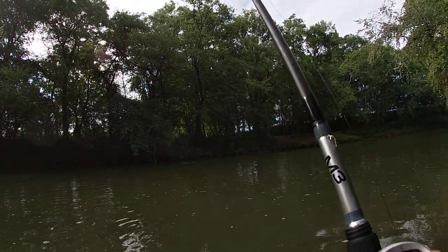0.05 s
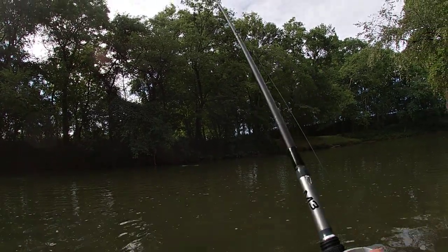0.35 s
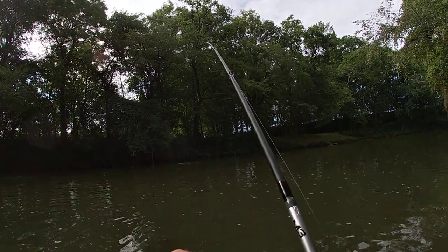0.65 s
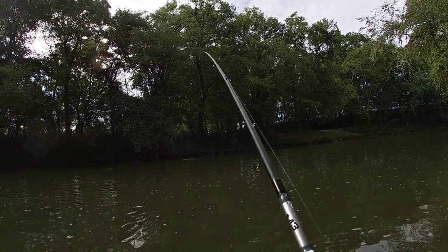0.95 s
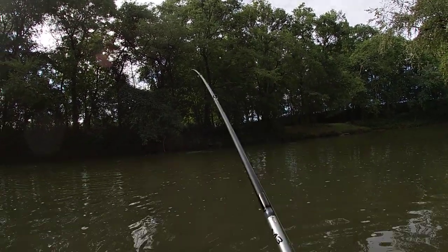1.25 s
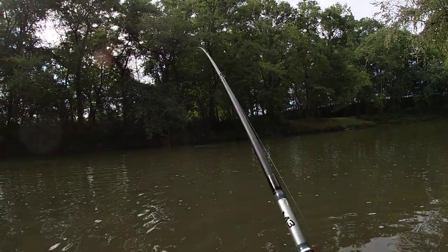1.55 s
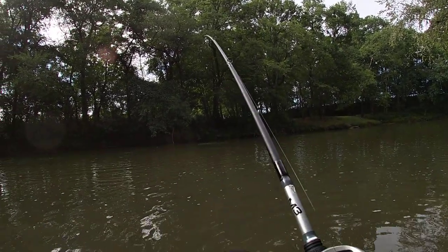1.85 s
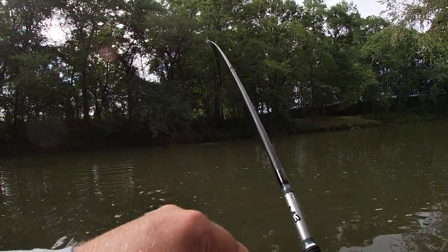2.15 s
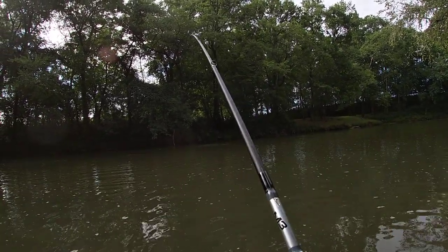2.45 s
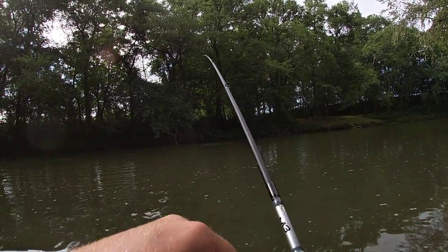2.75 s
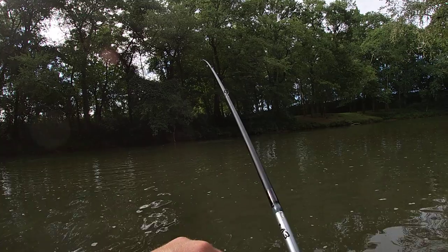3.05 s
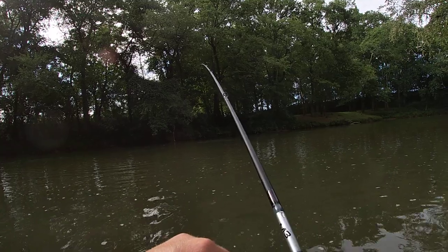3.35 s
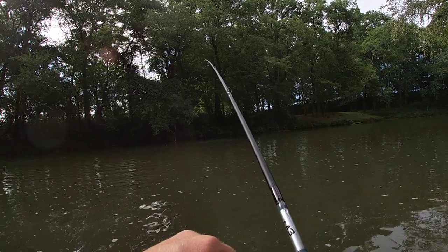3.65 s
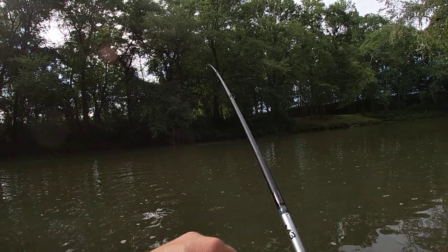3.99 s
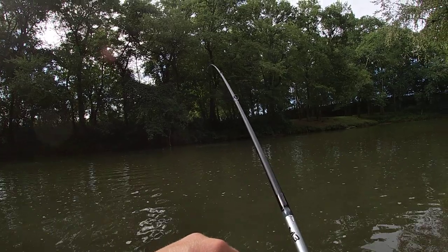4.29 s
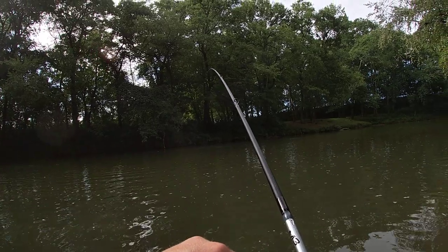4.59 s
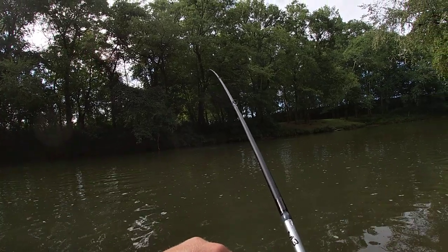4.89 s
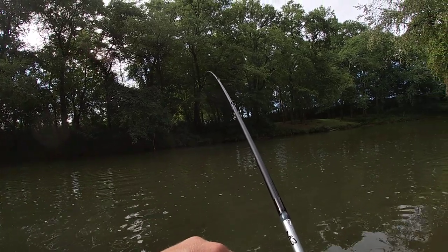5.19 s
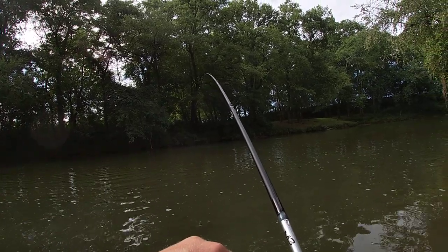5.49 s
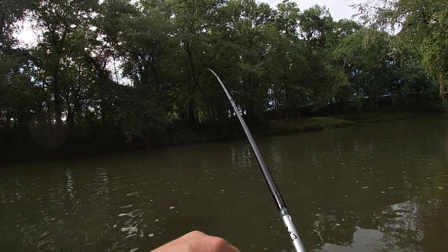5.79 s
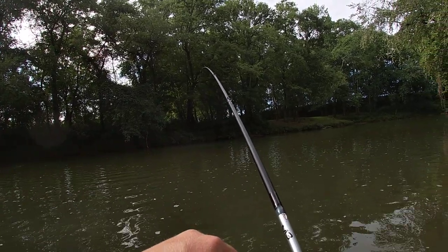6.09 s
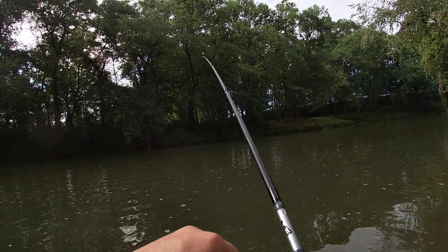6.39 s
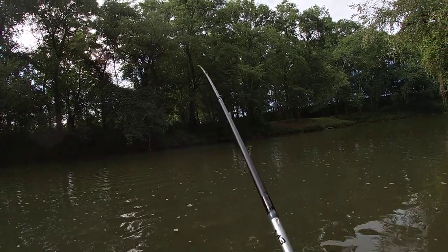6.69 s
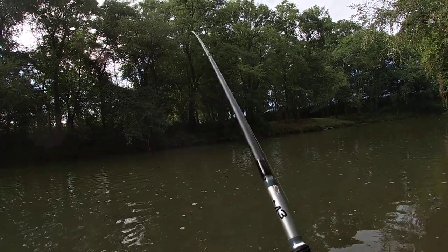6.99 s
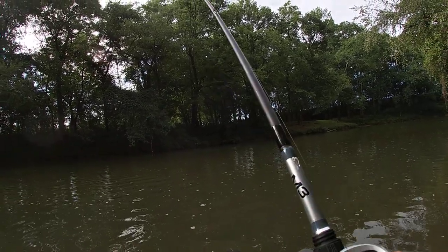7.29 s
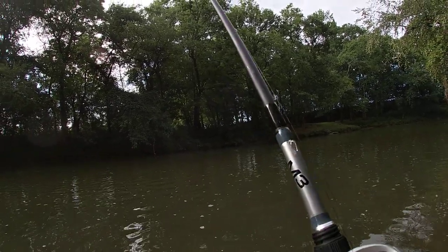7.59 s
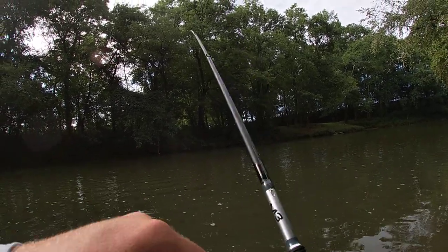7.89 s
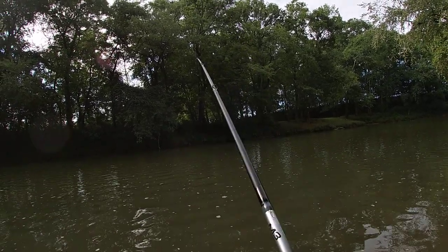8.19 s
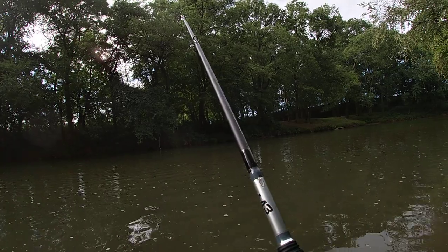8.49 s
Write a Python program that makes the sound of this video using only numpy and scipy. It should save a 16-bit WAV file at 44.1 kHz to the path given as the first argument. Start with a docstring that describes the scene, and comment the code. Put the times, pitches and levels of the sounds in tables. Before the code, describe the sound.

A spinning reel whirrs steadily right at the microphone while taut line rasps and squeaks through the rod guides in short tugs. About three and a half seconds in, the drag rattles with bright metallic clicks and the line squeals up in pitch, then sinks. After a quieter stretch, a second surge comes near seven seconds. The rod knocks softly now and then, with a faint creek and light wind beneath.

```python
"""A spinning reel whirrs right at the microphone as an angler cranks against a hooked fish.
Gear teeth excite the housing's resonances and throb with the rotor. Taut line rasps and sings through
the rod guides by stick-slip friction, higher the faster it runs. When the fish surges, the drag slips
and its clicker sets the spool ringing. The rod knocks softly; faint wind and a creek lie beneath."""
import sys
import numpy as np
from scipy import signal
from scipy.fft import rfft, irfft
from scipy.io import wavfile
from scipy.ndimage import uniform_filter1d

SR = 44100
rng = np.random.default_rng(int(sys.argv[2]) if len(sys.argv) > 2 else 0)


def wav_record(signal):
    """Record a signal, one row per channel, as 16-bit PCM in the file named by sys.argv[1]."""
    frames = np.transpose(np.atleast_2d(signal))
    bounded = np.clip(frames, -1, 1)
    # unit amplitude maps onto the largest positive 16-bit level
    quanta = np.round(bounded * 32767).astype(np.int16)
    wavfile.write(sys.argv[1], SR, quanta)


N = 381024
TIME = np.arange(N) / SR
BIN_HZ = np.maximum(np.arange(N // 2 + 1) * SR / N, 1)


def from_db(db):
    """Decibels as an amplitude ratio."""
    return 10 ** (np.asarray(db) / 20)

def unit_rms(x):
    """Normalisation to unit power."""
    return x / np.sqrt(np.mean(x ** 2) + 1e-20)

def in_time(rows):
    """Linear interpolation of each column at every sample."""
    times, *columns = np.transpose(rows)
    return [np.interp(TIME, times, column) for column in columns]

def response_db(spectrum, hz, modes=()):
    """Frequency response: a curve on a log-frequency axis plus Lorentzian resonances."""
    knots_hz, knots_db = np.transpose(spectrum)
    resonances = sum(db / (1 + (2 * (hz - centre) / width) ** 2) for centre, width, db in modes)
    return np.interp(np.log(hz), np.log(knots_hz), knots_db) + resonances

def coloured(x, spectrum, modes=()):
    """Source and filter: an excitation shaped by a frequency response, at unit power."""
    return unit_rms(irfft(rfft(x) * from_db(response_db(spectrum, BIN_HZ, modes)), N))

def noise():
    """White Gaussian noise."""
    return rng.standard_normal(N)

def drift(rate_hz):
    """Random modulation: low-passed noise of unit power."""
    return unit_rms(irfft(rfft(noise()) / (1 + (BIN_HZ / rate_hz) ** 2), N))

def band(x, low_hz, high_hz):
    """Gentle Butterworth band-pass."""
    return signal.sosfilt(signal.butter(2, [low_hz, high_hz], "band", fs=SR, output="sos"), x + 1e-18)

def ring(x, hz, t60_s):
    """Damped resonator: a unit impulse starts a sine of amplitude 1."""
    radius, step = from_db(-60 / (t60_s * SR)), 2 * np.pi * hz / SR
    return signal.lfilter([0, np.sin(step)], [1, -2 * radius * np.cos(step), radius ** 2], x + 1e-18)

def grains(per_s, spread_db):
    """Poisson process: tiny impacts of uneven size and either sign."""
    sizes = from_db(spread_db * np.clip(noise(), -2, 2)) * rng.choice([-1, 1], N)
    return sizes * (rng.random(N) < per_s / SR)

def impulses(times, heights):
    """Ideal impacts: one impulse at each time."""
    out = np.zeros(N)
    out[np.clip(np.round(np.asarray(times) * SR).astype(int), 0, N - 1)] = heights
    return out

def bursts(x, t60_s):
    """Exponential decay: each impulse becomes a dying burst of noise."""
    return signal.lfilter([1], [1, -from_db(-60 / (t60_s * SR))], x + 1e-18) * noise()

def envelope(start, length, attack_s, release_s):
    """Gate with linear ramps centred on its start and end."""
    rise = np.clip(.5 + (TIME - start) / attack_s, 0, 1)
    fall = np.clip(.5 + (start + length - TIME) / release_s, 0, 1)
    return rise * fall

def swells(rows, wander, wander_hz):
    """Tones under half-cosine windows, with random frequency modulation."""
    clock = np.cumsum(1 + wander * drift(wander_hz)) / SR
    out = np.zeros(N)
    for middle, length, hz, db in rows:
        on = np.abs(TIME - middle) < length / 2
        window = np.cos(np.pi * (TIME[on] - middle) / length)
        out[on] += from_db(db + 4) * window * np.sin(2 * np.pi * hz * clock[on])
    return out


# spectrum of the creek and its bank: frequency_hz, gain_db
CREEK_SPECTRUM = [(40, 5.5), (70, -12), (115, -4), (165, 8), (200, 6.5), (260, 2), (400, -5), (700, 1.5),
                  (1200, -36), (3000, 0), (12000, -44)]
def creek(level_db=-49.5):
    """Stationary filtered noise: the steady murmur of water."""
    return from_db(level_db) * coloured(noise(), CREEK_SPECTRUM)

# spectrum of wind on the microphone: frequency_hz, gain_db
WIND_SPECTRUM = [(15, -9), (30, 2), (50, -13.5), (80, -17), (160, -26), (500, -62)]
# puffs of wind: start_s, length_s, level_db
WIND_GUSTS = [(0, 0.11, -53), (.32, 0.38, -42), (1.25, 0.28, -52), (2.5, .25, -63), (4.25, 2.77, -67),
              (7.961, 0.097, -41)]
def wind(calm_db=-65):
    """Turbulent pressure on the microphone: a low rumble that rises in puffs."""
    gusts = sum(from_db(db) * envelope(start, length, attack_s=.05, release_s=.1)
                for start, length, db in WIND_GUSTS)
    return (from_db(calm_db) + gusts) * coloured(noise(), WIND_SPECTRUM)

# faint hums from afar: middle_s, length_s, pitch_hz, relative_level_db
DISTANT_HUMS = [(5.5, 2.6, 64, -59), (6.5, 2, 212, -58)]
def distant_hums():
    """Slow frequency modulation makes two low tones waver."""
    return swells(DISTANT_HUMS, wander=.0206, wander_hz=7.9)

def handling():
    """Sliding friction: the hand brushes the rod grip as it takes hold of the crank."""
    # time_s, level_db
    brush = [(0, -81), (.1, -71), (.13, -32), (.25, -31.5), (.28, -29), (.35, -27), (.45, -34.5),
             (.65, -44), (.75, -62)]
    return from_db(in_time(brush)[0]) * unit_rms(band(noise(), 200, 1000))

# knocks on the rod: start_s, relative_level_db, pitch_hz, t60_s
ROD_KNOCKS = [(0.103, -16.5, 725, 0.022), (0.127, -11, 410, 0.035), (0.18, -19, 380, .03),
              (0.259, -8.5, 179, 0.23), (6.305, -22.5, 676, 0.057), (6.313, -25, 333.5, 0.058),
              (6.694, -18.5, 544, 0.0055), (7.96, -27, 1503, 0.02), (8.033, -24, 1187, 0.0072),
              (8.253, -25, 298, 0.23)]
def knocks():
    """Impact excitation: the rod shifts in the grip, giving a hollow damped tone and a dull thud."""
    starts, levels_db, _, _ = np.transpose(ROD_KNOCKS)
    tones = sum(ring(impulses([start], from_db(db - .5)), hz, t60) for start, db, hz, t60 in ROD_KNOCKS)
    thuds = bursts(impulses(starts, from_db(levels_db)), t60_s=.022)
    return band(tones + band(thuds, 400, 2300), 290, 6000)

# squeaks of the line: middle_s, length_s, pitch_hz, relative_level_db
LINE_SQUEAKS = [(.372, .044, 2360, -24), (.508, .058, 2430, -26), (.51, 0.05, 800, -29.5),
                (.615, .028, 2780, -32), (.66, 0.027, 3400, -22), (1.415, .04, 2600, -29),
                (1.635, 0.06, 2292, -30), (3.495, .025, 2040, -24), (3.695, .018, 2520, -19.5),
                (3.82, .22, 1815, -25.5), (7.048, 0.037, 2495, -23), (7.055, 0.099, 2960, -22.5),
                (7.29, 0.028, 3300, -24.5), (7.365, 0.088, 4160, -29), (7.595, 0.073, 3500, -40),
                (8.19, .025, 1920, -26), (8.325, .04, 1849, -21), (8.42, .13, 2502, -32)]
def squeaks():
    """Friction-induced oscillation: brief rough tones as the line bites."""
    return swells(LINE_SQUEAKS, wander=.0308, wander_hz=192)

# cranking speed of the rotor: time_s, turns_per_s
ROTOR_SPEED = [(0, 10.6), (2.45, 13.2), (3.5, 15.6), (4.2, 9), (5.6, 12.1), (6.0, 11.7), (6.65, 10.4),
               (7.5, 10.85), (8.64, 11.3)]
def rotor_angle():
    """Angle in radians, the integral of rotation speed; it modulates line and gears alike."""
    return 2 * np.pi * np.cumsum(in_time(ROTOR_SPEED)[0]) / SR

# line creeping over the guides between tugs: time_s, level_db
LINE_CREEP = [(0, -40), (.95, -43), (1.8, -37), (2.1, -39.5), (2.9, -49), (3.0, -36), (3.2, -43),
              (5.3, -43.5), (5.6, -56), (6.6, -57), (7.0, -38.5), (7.9, -45.5), (8.64, -38.5)]
# short tugs of the fish: start_s, length_s, level_db, top_pitch_hz, tonal_share
FISH_TUGS = [(.09, .17, -33.5, 600, .05), (0.261, 0.16, -28, 800, 0.3), (0.478, 0.11, -25.5, 810, 0),
             (0.596, 0.11, -25.5, 880, 0.28), (0.995, .16, -37.5, 790, 0.5), (1.239, 0.12, -28, 720, 0.1),
             (1.375, .09, -26, 900, 0.05), (1.51, 0.088, -24.5, 1222, 0.61), (1.555, 0.18, -27, 1150, 0.75),
             (1.76, .18, -34, 880.2, 0.23), (2.15, .105, -27, 1228, 0.6), (2.289, 0.15, -33.5, 860, 0.26),
             (2.505, 0.092, -27, 1160, .65), (2.639, .3, -43, 807, 0.4), (3.056, 0.099, -28.5, 950, 0.58),
             (3.214, 0.13, -24, 1020, 0.37), (5.478, 0.063, -39, 650, 0.1),
             (5.816, 0.091, -33.5, 610, 0.24), (6.052, 0.15, -34, 657, 0.04),
             (6.187, .15, -32.5, 628, 0.04), (6.71, .1, -35.5, 600, 0.1), (6.856, 0.14, -29.5, 800, 0.01),
             (7.739, 0.085, -30.5, 820, 0.27), (7.958, 0.071, -34, 650, 0.01),
             (8.044, 0.062, -22.5, 950, 0.78), (8.176, 0.17, -22.5, 980, 0.28),
             (8.34, 0.19, -23, 1280, 0.47), (8.533, 0.13, -29.5, 800, 0.25)]
# two long runs of the fish: time_s, pitch_hz, level_db, tonal_share
FIRST_FISH_RUN = [(3.375, 1010, -25.5, 0.01), (3.58, 1253, -25, .05), (3.65, 1950, -21, .3),
                  (3.71, 1990, -24.5, 0.4), (3.76, 1940, -20, 0.7), (3.9, 1856, -21.5, 0.75),
                  (4.0, 1462, -26.5, 0.76), (4.1, 1085, -27.5, 0.7), (4.24, 1187, -30, .3),
                  (4.35, 852, -30.5, 0.66), (4.47, 847, -33.5, 0.43), (4.62, 947, -27.5, 0.75),
                  (4.72, 874, -32.5, 0.53), (5.05, 791, -34, 0.39), (5.35, 906, -38.5, 0)]
SECOND_FISH_RUN = [(7.0, 1000, -23, 0.022), (7.2, 1650, -26, .03), (7.34, 2120, -24, 0.21),
                   (7.39, 1804, -23, 0.52), (7.44, 1080, -26.5, 0.77), (7.49, 964, -29, 0.7),
                   (7.55, 1648, -24, 0.52), (7.62, 1738, -22, 0.5), (7.67, 1300, -24.5, 0.6),
                   (7.71, 742, -24, 0.56)]
def line_motion(creep_hz=741, creep_tonal_share=.17, attack_s=.022, release_s=.04):
    """Power summation of pulls: the strongest leads the friction's gain, pitch and tonal share."""
    pulls = [(from_db(in_time(LINE_CREEP)[0]), creep_hz, creep_tonal_share)]
    for start, length, db, top_hz, share in FISH_TUGS:
        # the line speeds up and slows, so the pitch arches; longer tugs sag more at their ends
        from_crest = np.interp(TIME, [start, start + .45 * length, start + length], [-1, 0, 1])
        sag = min(2.4 * length, .3)
        gain = from_db(db) * envelope(start, length, attack_s, release_s)
        pulls.append((gain, top_hz * (1 - sag * from_crest ** 2), share))
    for run in (FIRST_FISH_RUN, SECOND_FISH_RUN):
        hz, db, share = in_time(run)
        start, end = run[0][0], run[-1][0]
        pulls.append((from_db(db) * envelope(start, end - start, attack_s, release_s), hz, share))
    power = sum(gain ** 2 for gain, _, _ in pulls)
    pitch_hz = sum(gain ** 2 * hz for gain, hz, _ in pulls) / power
    tonal_share = sum(gain ** 2 * share for gain, _, share in pulls) / power
    return np.sqrt(power), pitch_hz, tonal_share

# the rod's response to the line's note: frequency_hz, gain_db
ROD_RESPONSE = [(180, -7), (500, 1.5), (800, -6.5), (1500, 2), (2500, -2.5), (3200, 5), (3700, 5),
                (4500, -13), (8000, -25)]
# resonances of the rod: centre_hz, width_hz, gain_db
ROD_RESONANCES = [(1040, 210, 1.4), (1880, 570, 10), (2490, 170, 9.8)]
def line_song(pitch_hz):
    """Stick-slip oscillation: three unsteady harmonics, weighted by the rod's response."""
    phase = 2 * np.pi * np.cumsum(pitch_hz * (1 + .028 * drift(160))) / SR
    song, power = 0, 0
    for k in (1, 2, 3):
        rolloff_db = (k - 1) ** 2
        gain = from_db(response_db(ROD_RESPONSE, k * pitch_hz, ROD_RESONANCES) - rolloff_db)
        # the grip comes and goes, so each partial flutters and sputters
        flutter = .48 + .46 * (drift(55) + 1j * drift(55))
        sputter = from_db(-1.5 * np.tanh(2.2 * drift(22)))
        song += gain * sputter * np.real(flutter * np.exp(1j * k * phase))
        # the partials below about 2 kHz share the friction's power
        power += gain ** 2 / (1 + (k * pitch_hz / 2300) ** 8)
    song /= np.sqrt(power)
    # levelled over about 40 ms, so that line tension sets the loudness
    song /= np.sqrt(uniform_filter1d(song ** 2, size=1800) + 1e-9)
    grip = 1 + .35 * np.tanh(2 * drift(20))  # brief losses of grip break the note up
    return song * grip

# friction noise radiated by rod and reel: frequency_hz, gain_db
RASP_SPECTRUM = [(80, -40), (150, -34), (300, -15), (520, -8), (800, -4.5), (1100, 2.5), (1400, -2),
                 (1900, 5), (2800, -2), (4200, -1.5), (7300, -0.5), (8500, -8.5), (10300, -14.5),
                 (11200, -25.5), (13000, -26.5), (15500, -43)]
def line(friction, pitch_hz, tonal_share, wobble=.025, stutter=.19):
    """Friction on the guides: a note inside a gritty rasp, modulated once per rotor turn."""
    swing = np.sin(rotor_angle())
    song = line_song(pitch_hz * (1 + wobble * swing))
    grit = grains(per_s=4000, spread_db=0) * from_db(1.4 * drift(43))
    rasp = from_db(1.5) * coloured(grit, RASP_SPECTRUM)
    gain = friction * (1 + stutter * tonal_share * swing) * from_db(1.6 * drift(6.8))
    return gain * (np.sqrt(tonal_share) * song + np.sqrt(1 - tonal_share) * rasp)

# slips of the drag: start_s, length_s, rattle_db, clicks_per_s, tick_over_ring_db
DRAG_SLIPS = [(1.278, 0.22, -31, 30, -11), (1.504, 0.13, -25.5, 32, -5.5), (2.168, 0.19, -31.5, 20.4, -7),
              (3.38, 0.14, -25, 82, -14), (3.53, .19, -19.5, 35, -17), (3.743, 0.088, -28, 30.5, -22),
              (5.818, .06, -30.5, 47, -10), (6.0, .3, -40.5, 23.5, -4), (6.883, .13, -32.5, 52, -14),
              (7.027, .29, -24, 90, -9), (7.328, 0.17, -27, 20, -13), (8.21, .25, -34, 49, 1.5)]
def slip_clicks(over_rattle_db=12.5, spread_db=4):
    """Teeth pass the clicker at log-normal intervals; gives rows of start_s, ring_db, tick_db."""
    rows = []
    for start, length, rattle_db, per_s, tick_over_ring_db in DRAG_SLIPS:
        pause, strength, snap = rng.standard_normal((80, 3)).T
        times = start + np.cumsum(np.exp(.55 * pause - .15)) / per_s
        ring_db = rattle_db + over_rattle_db + spread_db * np.clip(strength, -2, 2)
        tick_db = ring_db + tick_over_ring_db + spread_db * snap
        rows += list(np.transpose([times, ring_db, tick_db])[times < start + length])
    return rows

# hardest snaps of the clicker: start_s, relative_ring_db, relative_tick_db
HARD_CLICKS = [(1.4833, -6.5, -15), (2.508, -13.5, -15), (3.3794, -14, -15), (3.3896, -9, -19),
               (3.421, -10, -10), (3.47, -21, -9), (3.4876, -12, -23), (3.552, -15, -29),
               (3.6147, -13, -27), (3.638, -11, -16), (3.7092, -4, -29), (4.29, -26, -21),
               (4.969, -18, -20), (5.02, -14, -26), (5.1069, -16, -18), (5.252, -8.5, -17),
               (5.9873, -13, -27), (6.035, -14, -37), (6.0785, -16, -30), (6.1828, -14, -32),
               (6.208, -18, -22), (6.2236, -12.5, -21), (7.1528, -14, -24), (7.2247, -7, -18),
               (7.3098, -7, -23), (7.349, -4, -28), (7.395, -11, -31), (7.4493, -12, -30), (7.523, -9, -30),
               (8.402, -13, -17), (8.602, -29.5, -14.5)]
# modes of clicker and spool: frequency_hz, gain_db, t60_s
SPOOL_MODES = [(6000, 1.5, 0.0052), (6864, 7.5, 0.0069), (7420, 10, 0.0071), (8030, 4.5, 0.0016)]
def drag():
    """Modal ringing: each snap of the clicker ticks and rings the spool; slipping adds a dense rattle."""
    times, ring_db, tick_db = np.transpose(HARD_CLICKS + slip_clicks())
    teeth = grains(per_s=460, spread_db=2)
    rings, rattle = 0, 0
    for k, (hz, mode_db, t60) in enumerate(SPOOL_MODES):
        # neighbouring modes start in antiphase, so the ring takes a moment to build
        mode_gain = (-1) ** k * from_db(mode_db)
        snaps = impulses(times, from_db(ring_db - 2)) * from_db(.93 * noise())
        rings += mode_gain * ring(snaps, hz, t60)
        rattle += mode_gain * ring(teeth * from_db(4.2 * noise()), hz, t60)
    scrape = bursts(impulses(times, from_db(tick_db)), t60_s=.012)
    ticks = from_db(6.5) * band(scrape, 4430, 9340) + from_db(-3.5) * band(scrape, 10300, 12200)
    fine_ticks = band(bursts(teeth, t60_s=.0022), 6600, 13500)
    rattle = unit_rms(rattle) + from_db(-18.5) * unit_rms(fine_ticks)
    slipping = np.max([from_db(db) * envelope(start, length, attack_s=.01, release_s=.1)
                       for start, length, db, _, _ in DRAG_SLIPS], axis=0)
    return band(rings, 3700, 12000) + ticks + slipping * rattle

# loudness of the gears: time_s, relative_level_db
GEAR_LEVEL = [(0, -29), (1.5, -23), (3.3, -20.5), (3.365, -24.5), (3.4, -21.5), (4.4, -21), (5.5, -23),
              (6.98, -25), (7.05, -19), (7.11, -24), (7.8, -27.5), (8.14, -28), (8.25, -27), (8.64, -28.5)]
# load on the gears: time_s, low_shelf_db, relative_throb_depth
GEAR_LOAD = [(0, 4, 0.08), (.9, 4.5, 0.14), (1.7, 3.5, 0.19), (2.8, 2, 0.13), (3.6, -0.5, 0.21),
             (4.3, 1, 0.09), (5.6, -1, 0.03), (6.6, -1, 0.09), (7.8, -2, 0.2), (8.64, -0.5, 0.04)]
# response of the reel housing: frequency_hz, gain_db
HOUSING_RESPONSE = [(500, -30), (1400, -29.5), (2000, -23.5), (2600, -7), (3300, -4.5), (4500, -1),
                    (6000, 0), (7400, -2.5), (8000, -10.5), (8800, -25.5), (10000, -28.5), (11000, -35.5),
                    (13500, -37), (15000, -75)]
# resonances of the housing: centre_hz, width_hz, gain_db
HOUSING_RESONANCES = [(3210, 220, 4.5), (3555, 62, 6.5), (3844, 42, 8.5), (4280, 180, 3), (4740, 250, -2),
                      (5013, 170, 7), (5440, 42, 9.5), (5630, 120, 3), (6220, 470, 5.5), (6950, 150, 0)]
def gears(shelf_hz=4600):
    """Forced vibration: tooth contacts drive the housing, throbbing 2, 3 and 4 times per rotor turn."""
    level_db = in_time(GEAR_LEVEL)[0]
    shelf_db, depth = in_time(GEAR_LOAD)
    angle = rotor_angle()
    throb = np.cos(2 * angle) + .8 * np.cos(3 * angle) + .35 * np.cos(4 * angle)
    contacts = grains(per_s=9000, spread_db=3) * (1 + .7 * depth * throb)
    whirr = coloured(contacts, HOUSING_RESPONSE, HOUSING_RESONANCES)
    # heavier load brings out the lower half of the housing's range
    lower = irfft(rfft(whirr) / (1 + (BIN_HZ / shelf_hz) ** 8), N)
    upper = whirr - lower
    return from_db(level_db + 2) * (from_db(shelf_db) * lower + upper)

def scene():
    """Superposition in a free field: every source is central, with no echo."""
    reel = gears() + drag()
    rod = line(*line_motion()) + squeaks() + knocks() + handling()
    background = creek() + wind() + distant_hums()
    return np.tile(background + rod + reel, (2, 1))

# difference between the two microphone ports: frequency_hz, side_over_mid_db
PORT_DIFFERENCE = [(1000, -68), (5000, -70), (10000, -52), (11000, -31), (11800, -6.5), (16000, 3)]
def record(dry, peak_limit=.9, cutoff_hz=15800):
    """Soft saturation rounds the peaks, the top treble decorrelates between ports, a low-pass follows."""
    rounded = dry / (1 + np.abs(dry / peak_limit) ** 4) ** .25
    scattered = rounded[0] * np.sqrt(2) * np.cos(np.pi * drift(150))
    side = irfft(rfft(scattered) * from_db(response_db(PORT_DIFFERENCE, BIN_HZ)), N)
    low_pass = signal.ellip(10, .1, 80, cutoff_hz, fs=SR, output="sos")
    return signal.sosfilt(low_pass, rounded + side * [[1], [-1]])


dry = scene()
out = record(dry)
wav_record(out)
```